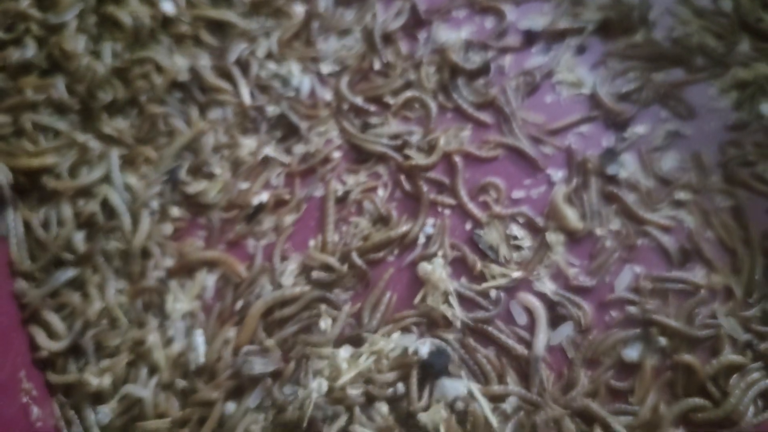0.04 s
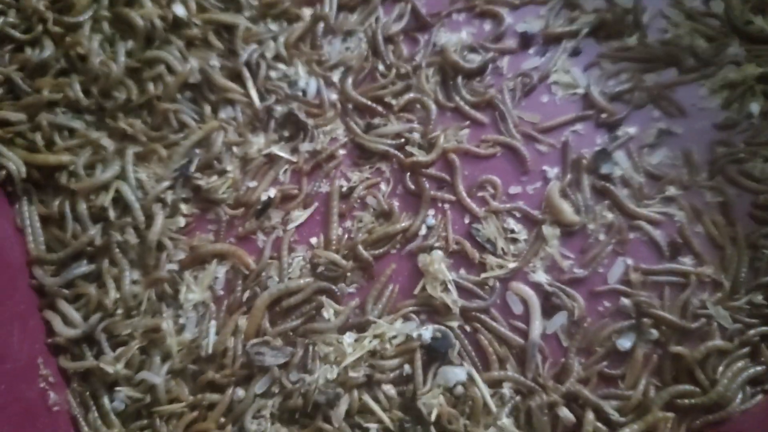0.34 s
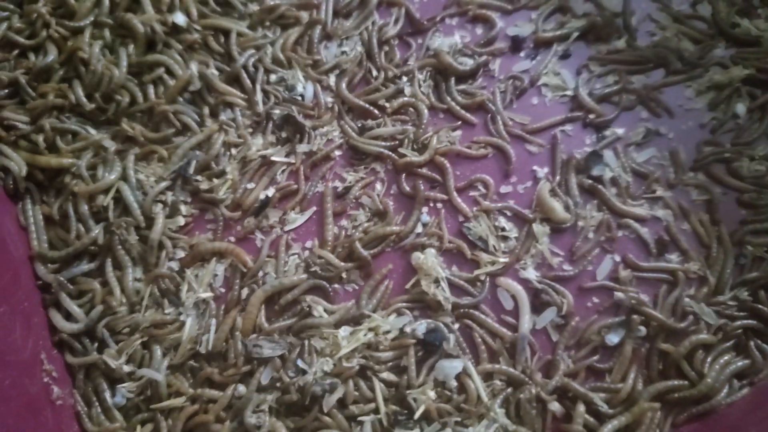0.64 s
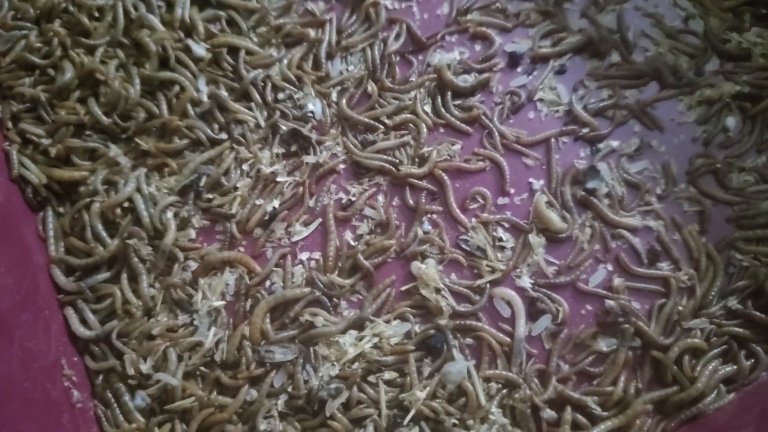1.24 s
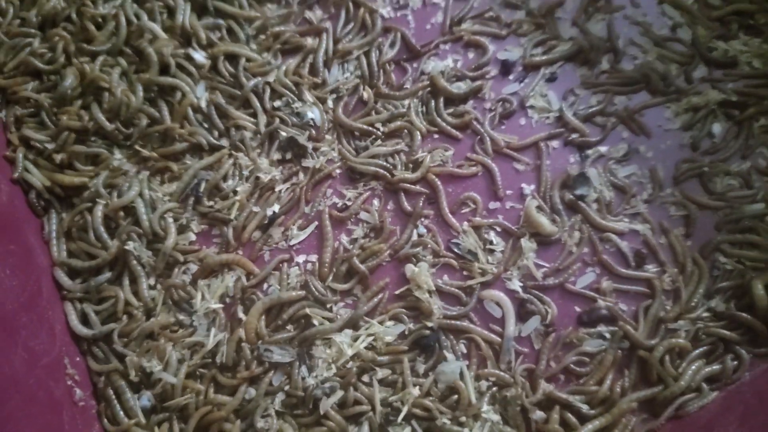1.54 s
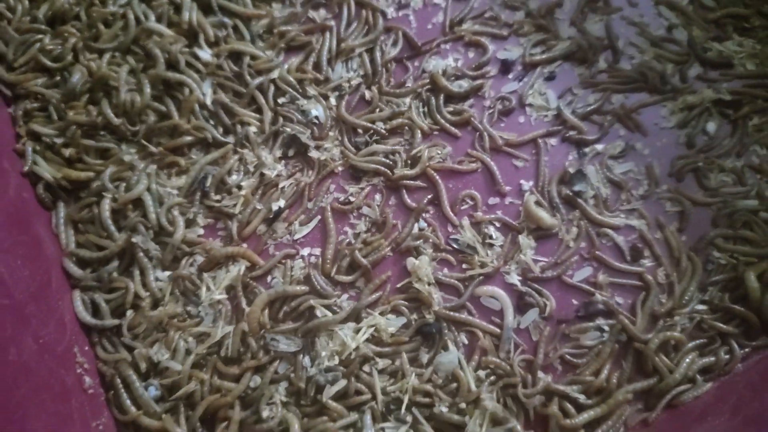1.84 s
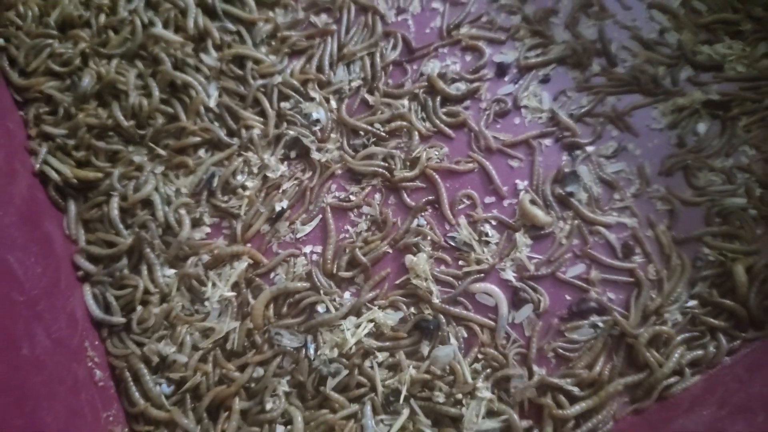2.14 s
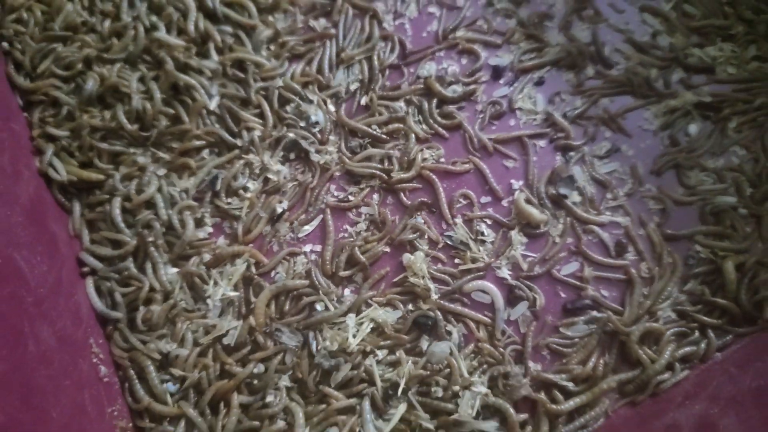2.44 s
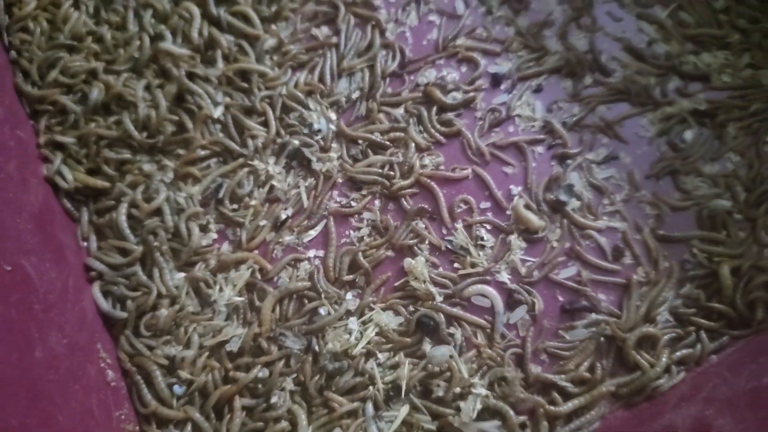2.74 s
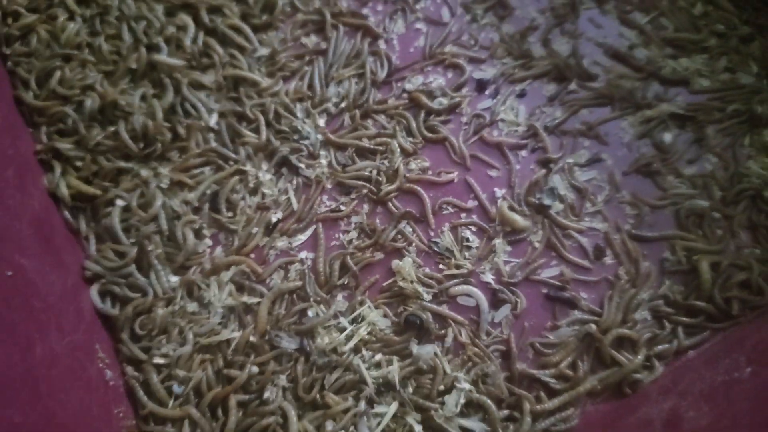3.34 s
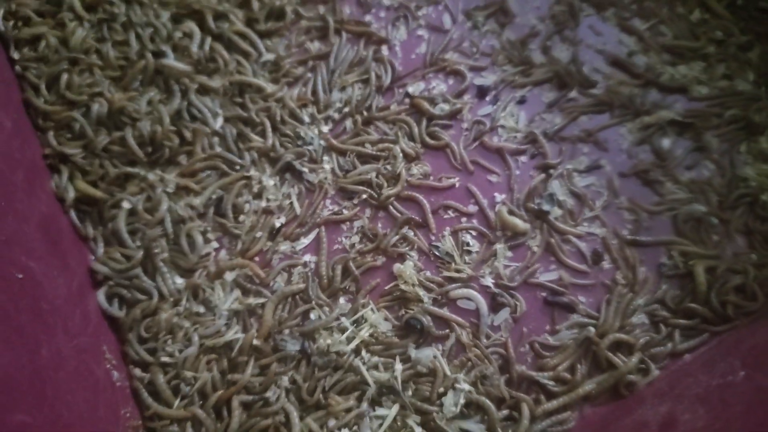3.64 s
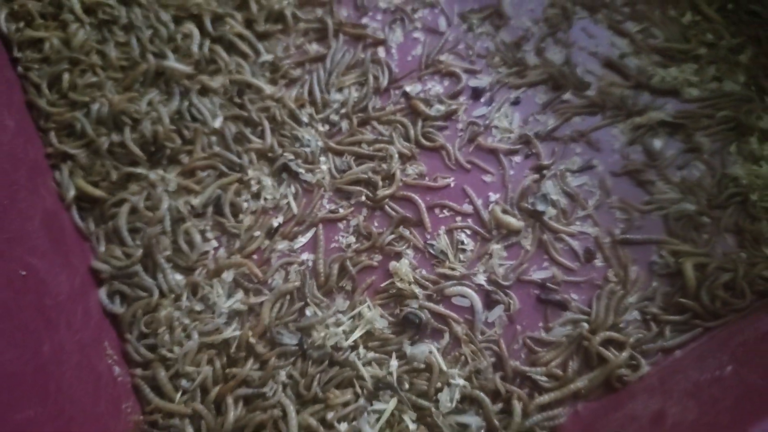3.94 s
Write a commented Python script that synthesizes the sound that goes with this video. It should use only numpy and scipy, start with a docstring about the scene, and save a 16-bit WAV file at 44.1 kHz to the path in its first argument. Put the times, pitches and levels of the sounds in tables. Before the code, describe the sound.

A plastic tub is knocked sharply at about 3 seconds and bumped more hollowly at 3.5, each clack ringing briefly in a small, hard-walled room. Earlier, soft rustles come at 0.2 and 0.7 seconds, and dull finger thumps hit the left microphone at the start and from 1.3 to 2.9 seconds. Faint rubs continue to the end near 4 seconds, over a quiet, steady room hum.

```python
"""A small, hard-walled room, heard through a camera's stereo microphones. A plastic tub is handled:
a sharp knock, then a hollower bump, each clacking at the contact, ringing the tub's walls and
drawing an answer from the room. Before them come dull thumps and soft rustles of fingers on the
camera, the thumps close on its left microphone; a few faint rubs run on to the end.
A quiet room hum lies under everything."""
import sys
import numpy as np
from scipy import signal
from scipy.fft import rfft, irfft, next_fast_len
from scipy.io import wavfile
from scipy.ndimage import map_coordinates

SR = 44100
rng = np.random.default_rng(int(sys.argv[2]) if len(sys.argv) > 2 else 0)


def int16_out(signal):
    """Quantize to a 16-bit WAV file."""
    q = np.round(np.clip(np.atleast_2d(signal).T, -1, 1) * 32767)
    wavfile.write(sys.argv[1], SR, q.astype(np.int16))


N = 176400

# Blows on the tub. Each row: start in seconds, level of the room's answer in dB, its tilt in dB/octave.
BLOWS = [(3.0264, -29.5, 0.06), (3.4778, -25.5, 0.1)]
# The modes of the tub's walls. Each entry: pitch in Hz.
MODE_HZ = [101, 173, 212, 277, 342, 404, 452, 506, 565, 735, 906, 1005, 1125, 1208, 1560, 1629]
# The same modes in order. Each row: level in the knock in dB, level in the bump in dB, t60 in seconds.
MODE_RINGS = [(-22, -23, .18), (-41, -35, .4), (-46, -33, .28), (-32, -42, .22), (-34, -28.5, .4),
              (-38, -39, .33), (-47, -31, .3), (-35, -33, .28), (-30, -35, .26), (-42, -23.5, .22),
              (-44, -28, .21), (-31, -31, .19), (-35, -27, .23), (-32, -26.5, .21), (-36, -32, .18),
              (-32, -40, .2)]
MODE_RISE_CYCLES, MODE_RISE_S = 1.35, 0.0037  # a mode builds up over these cycles plus this time
# Contact clacks. Each row: start in seconds, level in dB, pitch in Hz, t60 and rise in seconds.
CLACKS = [(3.0256, -12.7, 1280, .0065, .0011), (3.0278, -23.5, 1550, .008, .0007),
          (3.062, -26, 1000, .012, .001), (3.475, -33, 1500, .012, .001), (3.4778, -19.5, 1130, .05, .0025),
          (3.5155, -29, 1700, .015, .001)]
CLACK_PAN_DB, RING_PAN_DB, ANSWER_PAN_DB = 9, -0.5, 1  # left microphone over right

# Colour of the room's answer to a blow. Each row: frequency in Hz, level in dB.
ANSWER_SPECTRUM = [(50, -32), (100, -11), (150, -8), (300, -5), (750, -1.5), (1250, -2), (1450, -4),
                   (1800, -10), (2000, -10.5), (2200, -8), (2700, -17), (3300, -26), (4500, -33),
                   (7000, -47), (15000, -65)]
# How long the room rings. Each row: frequency in Hz, t60 in seconds.
ROOM_T60 = [(100, 0.91), (400, 0.27), (1300, 0.14), (4000, 0.31), (12000, 0.32)]
TAIL_DB, TAIL_T60_S = -14, 1  # the room's slow late tail
# How alike a blow sounds at the two microphones. Each row: frequency in Hz, correlation.
BLOW_CORRELATION = [(100, 0.97), (350, 0.78), (800, 0), (2000, 0)]

# Fingers bumping the camera. Each row: centre time in seconds, level on the left in dB, pitch in Hz.
THUMPS = [(.021, -29.5, 104), (0.037, -37, 130), (.059, -27, 125), (0.081, -34, 90), (0.1, -32.5, 103),
          (.125, -37, 80), (0.236, -31.5, 104), (1.284, -39, 88.5), (1.324, -33, 82), (1.44, -34, 114),
          (1.503, -33, 85.5), (1.534, -26.5, 113), (1.544, -27.5, 130), (1.559, -26, 117),
          (1.633, -36.5, 83), (2.046, -26.5, 93), (2.09, -27, 104), (2.13, -24, 121), (2.145, -24.5, 153),
          (2.275, -26.5, 157), (2.302, -31, 102), (2.322, -29.5, 115), (2.339, -31, 93), (2.511, -41, 109),
          (2.922, -28, 89.5)]
THUMP_WIDTH_CYCLES, THUMP_RIGHT_DB = 0.68, -36

# Soft rubs. Each row: start in seconds, level in dB, rise, hold and t60 in seconds, tilt in dB/octave.
RUSTLES = [(.18, -44.5, 0.011, 0.022, 0.49, -1.2), (.646, -41, 0.015, 0.035, 0.7, -0.45),
           (.775, -47, 0.02, 0.014, 0.48, -0.9), (.548, -62, 0.018, 0.021, 0.86, 7.5),
           (2.682, -54.5, 0.0046, 0.0087, 0.44, 1), (3.698, -58, 0.005, 0.011, .3, 4.5),
           (3.805, -51.5, 0.005, 0.163, 0.49, -.5), (1.3, -59.5, 0.021, 0.037, 0.23, -1)]
# Light, hissing slides. Each row: as for the rubs.
SLIDES = [(.085, -68.5, 0.018, .015, .5, 0), (.39, -64.5, 0.027, .015, 0.39, 4),
          (.55, -70, 0.017, .02, 0.31, -5), (.642, -54.5, 0.0058, .008, 0.32, -12),
          (.8, -71, 0.032, 0.12, 1.3, -7), (1.71, -71, 0.035, .015, 0.29, -3),
          (2.48, -59.5, 0.02, .02, .35, -13), (2.679, -60, 0.005, .008, .35, -11.5),
          (3.1, -75.5, .06, .08, 0.86, -3), (3.39, -61, 0.064, .01, .3, -3),
          (3.476, -51, 0.013, 0.011, 0.28, -6), (3.64, -71, 0.026, 0.018, 0.23, 1)]
# The narrow rasp where a firm rub bites. Each row: as for the rubs.
RASPS = [(.183, -49.5, 0.017, 0.024, 0.4, -2.5), (.655, -43, 0.0092, 0.013, 0.27, 2)]
# Colours of these three kinds of friction. Each row: frequency in Hz, level in dB.
RUSTLE_SPECTRUM = [(150, -3), (300, 4.5), (650, -3.5), (860, 2.5), (1100, -4), (1290, 4), (1500, -0.5),
                   (1800, 2.5), (2000, -2.5), (2200, 4), (2700, -2.5), (3250, -10.5), (4100, -9.5),
                   (4750, -13.5), (5100, -14.5), (5600, -18), (10000, -28), (15500, -42)]
SLIDE_SPECTRUM = [(1000, -60), (2500, -16), (4500, -3.5), (7500, -0.5), (9500, 2.5), (15500, -1)]
RASP_SPECTRUM = [(900, -44), (1700, -7), (2250, 1), (2700, -6), (3300, -18), (4100, -14), (7000, -45)]
# How alike friction sounds at the two microphones. Each row: frequency in Hz, correlation.
FRICTION_CORRELATION = [(200, 1), (1000, 0), (4000, 0), (12000, 0)]
# Friction leans mostly left. Each row: frequency in Hz, left over right in dB.
FRICTION_BALANCE = [(100, 4), (400, 1), (800, -1), (2000, 3), (4500, 6), (8000, 3), (14000, 2)]
GRAIN_DB, GRAIN_RATE_HZ = -0.5, 218  # a slight, fast flicker in a stroke's level

# Colour of the room's steady air. Each row: frequency in Hz, level in dB.
AIR_SPECTRUM = [(25, -28), (50, -6.5), (75, -7.5), (100, -0.5), (130, -10), (180, -2), (230, -6),
                (300, -3.5), (440, -8), (560, -13), (640, -9), (740, -14.5), (1400, -13.5), (1600, -12),
                (1950, -17), (2400, -17.5), (3200, -28.5), (5700, -37), (9000, -42.5), (15500, -46)]
# How alike the air sounds at the two microphones. Each row: frequency in Hz, correlation.
AIR_CORRELATION = [(40, 0), (120, 0.86), (350, 0.93), (800, 0.12), (2000, 0.13), (10000, 0)]
# Where the air sits between the microphones. Each row: frequency in Hz, left over right in dB.
AIR_BALANCE = [(100, 3.5), (400, -1), (1000, 0.5), (2200, 3), (4500, 6.5), (8000, 1), (14000, 3.5)]
# The hum's tones, dead centre. Each row: frequency in Hz, rms level in dB.
HUM_TONES = [(100.5, -64.5), (296, -65)]
AIR_DB, HUM_WANDER_RAD = -50, 0.57
CAMERA_TOP_HZ = 15730


def tub_blows():
    """Each blow rings the tub's walls, is answered by the room and clacks at the contact."""
    out = np.zeros((2, N))
    for blow, (start, answer_db, tilt_db) in enumerate(BLOWS):
        add(out, start, wall_ring(blow) + room_answer(answer_db, tilt_db))
    for start, db, hz, t60, rise in CLACKS:
        add(out, start, clack(db, hz, t60, rise))
    return out


def wall_ring(blow):
    """The plastic walls' modes swell and die away; blow 0 is the sharp knock, 1 the hollow bump."""
    ring, t = np.zeros((2, SR)), np.arange(SR) / SR
    for hz, (*levels_db, t60) in zip(MODE_HZ, MODE_RINGS):
        spread = stereo_angle(BLOW_CORRELATION, hz) * np.array([[1], [-1]])  # phase at each microphone
        phase = 2 * np.pi * rng.random() + spread * rng.choice([-1, 1])
        swell = 1 - np.exp(-(t / (MODE_RISE_S + MODE_RISE_CYCLES / hz)) ** 2)
        ring += amp(levels_db[blow]) * np.sin(2 * np.pi * hz * t + phase) * swell * fade(t, t60)
    return pan(RING_PAN_DB) * ring


def clack(db, hz, t60, rise):
    """The short ring of the tub's wall right at a contact, left of centre."""
    t = np.arange(SR) / SR
    envelope = np.sin(np.pi / 2 * np.minimum(t / rise, 1)) ** 2 * fade(t - rise, t60)
    return pan(CLACK_PAN_DB) * amp(db) * np.sin(2 * np.pi * hz * t) * envelope


def room_answer(db, tilt_db):
    """Dense reflections off the hard walls: a noise burst whose bass hangs on longest."""
    reflections = noise(ANSWER_SPECTRUM, BLOW_CORRELATION, tilt_db=tilt_db)
    hz, frame_s, bands = signal.stft(reflections, SR, nperseg=256)
    decay = fade(frame_s, along(ROOM_T60, hz)[:, None]) + amp(TAIL_DB) * fade(frame_s, TAIL_T60_S)
    answer = signal.istft(bands * decay, SR)[1][:, :SR]
    onset = 1 - np.exp(-np.arange(SR) / SR / 0.00035)
    return amp(db) * pan(ANSWER_PAN_DB) * answer * onset


def finger_thumps():
    """Fingers shift on the camera: dull pushes of a cycle or two, close on the left microphone."""
    out, t = np.zeros((2, N)), np.arange(-SR // 50, SR // 50) / SR
    for centre, db, hz in THUMPS:
        envelope = signal.windows.tukey(len(t)) / np.cosh(2 * hz * t / THUMP_WIDTH_CYCLES)
        push = np.sin(2 * np.pi * (hz * t + rng.random())) * envelope
        add(out, max(centre + t[0], 0), amp(db) * amp([[0], [THUMP_RIGHT_DB]]) * push)
    return out


def friction(strokes, spectrum):
    """Rubbing fingers: grainy noise that rises, holds and dies away in the room."""
    out, t = np.zeros((2, N)), np.arange(SR) / SR
    for start, db, rise, hold, t60, tilt_db in strokes:
        envelope = np.minimum(t / rise, 1) * fade(t - rise - hold, t60)
        grain = amp(GRAIN_DB * wobble(GRAIN_RATE_HZ)[:SR])
        rub = noise(spectrum, FRICTION_CORRELATION, FRICTION_BALANCE, tilt_db)
        add(out, start, amp(db) * envelope * grain * rub)
    return out


def room_tone():
    """The room at rest: steady air noise with a faint, wavering hum."""
    t = np.arange(N) / SR
    air = amp(AIR_DB) * noise(AIR_SPECTRUM, AIR_CORRELATION, AIR_BALANCE, size=N)
    hum = sum(amp(db) * np.sqrt(2) * np.sin(2 * np.pi * hz * t + HUM_WANDER_RAD * wobble(7))
              for hz, db in HUM_TONES)
    return air + hum


def noise(spectrum, correlation, balance=None, tilt_db=0, size=SR):
    """Coloured noise at the two microphones, rms 1, tilted by tilt_db an octave about 1 kHz."""
    hz = np.fft.rfftfreq(size, 1 / SR)
    angle = stereo_angle(correlation, hz)
    colour = amp(along(spectrum, hz) + tilt_db * np.log2(np.maximum(hz, 100) / 1000))
    mid, side = rfft(rng.standard_normal((2, size))) * colour * [np.cos(angle), np.sin(angle)]
    gains = pan(along(balance, hz)) if balance else 1
    stereo = irfft(np.array([mid + side, mid - side]) * gains, size)
    return stereo / np.sqrt(np.mean(stereo ** 2) + 1e-20)


def stereo_angle(correlation, hz):
    """The turn from mid toward side, in radians, that gives this left-right correlation."""
    return np.arccos(np.clip(along(correlation, hz), -1, 1)) / 2


def amp(db):
    """Decibels to gain."""
    return 10 ** (np.asarray(db) / 20)


def along(points, hz):
    """Interpolate (Hz, value) points on a log frequency axis."""
    point_hz, values = np.transpose(points)
    return np.interp(np.log(hz + 1), np.log(point_hz + 1), values)


def fade(t, t60):
    """Full level until t = 0, then 60 dB down every t60 seconds."""
    return np.exp(-np.log(1000) * np.maximum(t, 0) / t60)


def pan(db):
    """Microphone gains that put left db above right."""
    return amp(np.array([[.5], [-.5]]) * db)


def wobble(rate):
    """A smooth random curve, rate knots a second."""
    return map_coordinates(rng.standard_normal(4000), [np.arange(N) * rate / SR], mode="mirror")


def add(out, start, sound):
    """Mix a sound in from start seconds."""
    i = round(start * SR)
    out[:, i:i + sound.shape[1]] += sound[:, :N - i]


def scene():
    """The tub, fingers on the camera and room tone, as they reach the microphones."""
    rubs = friction(RUSTLES, RUSTLE_SPECTRUM)
    slides = friction(SLIDES, SLIDE_SPECTRUM)
    rasps = friction(RASPS, RASP_SPECTRUM)
    return tub_blows() + finger_thumps() + rubs + slides + rasps + room_tone()


def record(dry):
    """The camera keeps nothing above its band limit."""
    size = next_fast_len(N + SR // 2)
    passband = np.fft.rfftfreq(size, 1 / SR) < CAMERA_TOP_HZ
    return irfft(rfft(dry, size) * passband, size)[:, :N]


dry = scene()
out = record(dry)
int16_out(out)
```